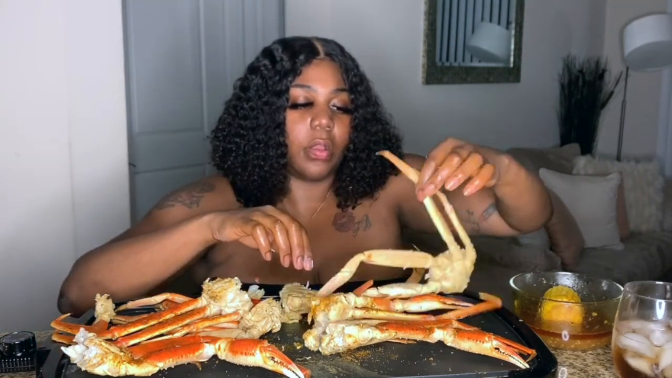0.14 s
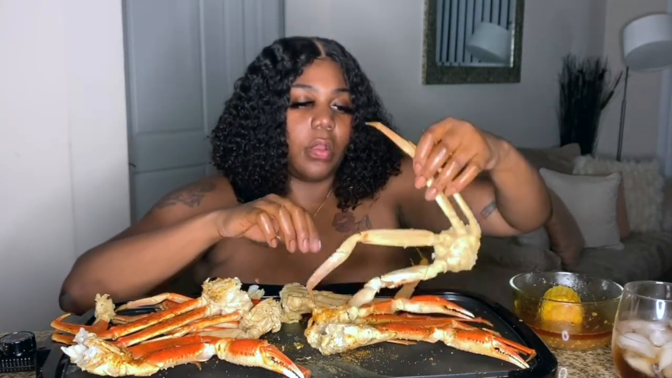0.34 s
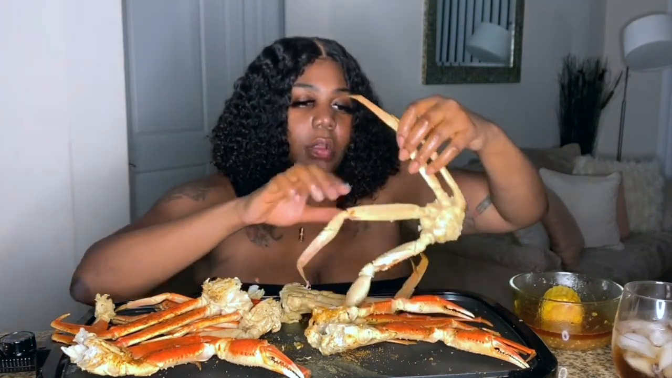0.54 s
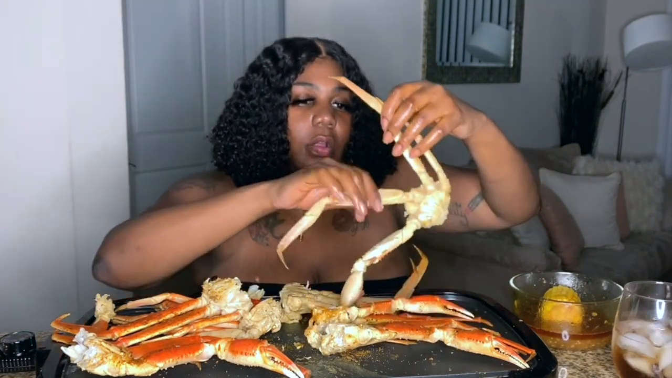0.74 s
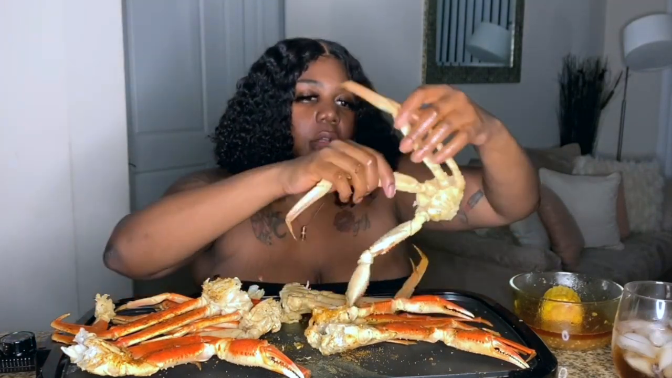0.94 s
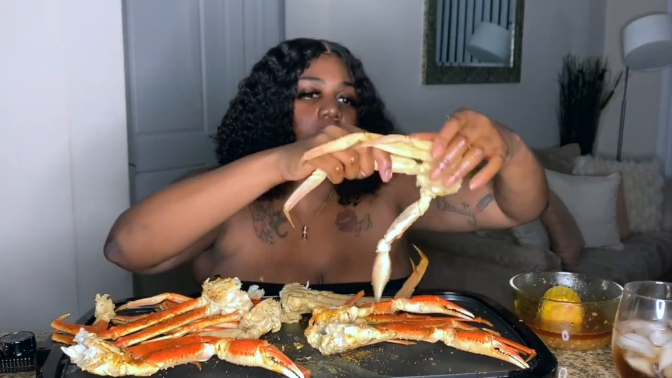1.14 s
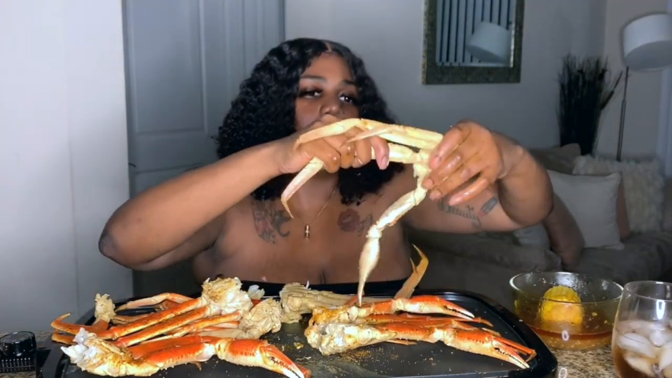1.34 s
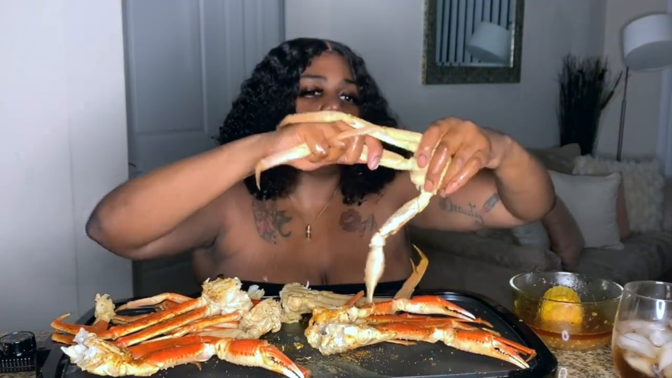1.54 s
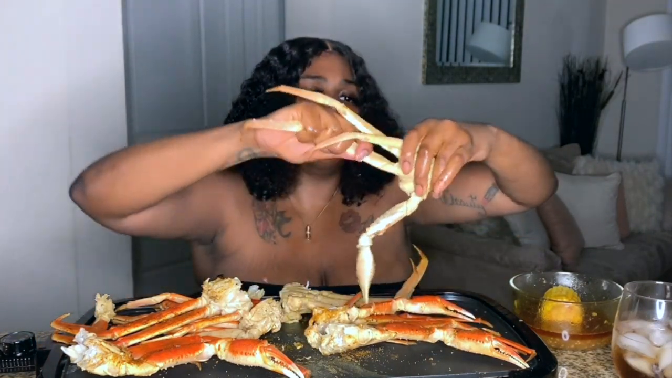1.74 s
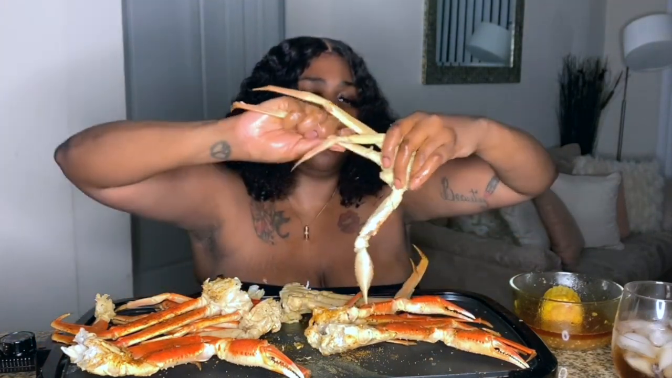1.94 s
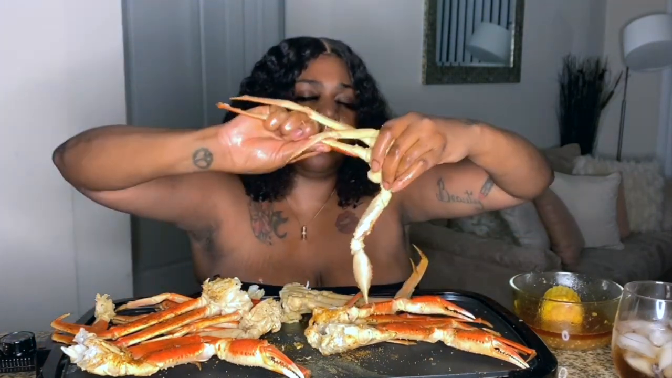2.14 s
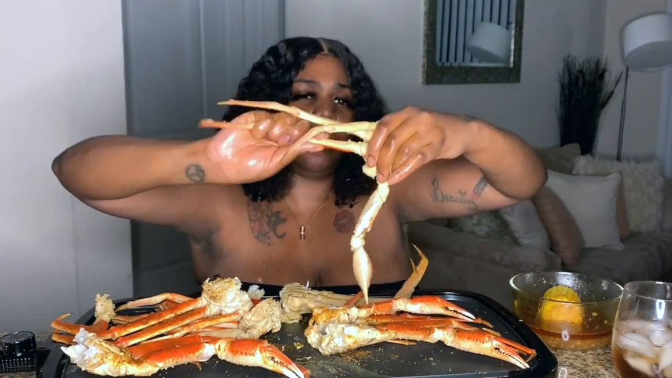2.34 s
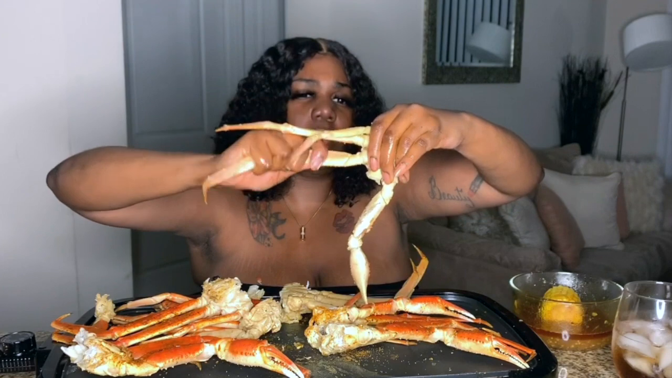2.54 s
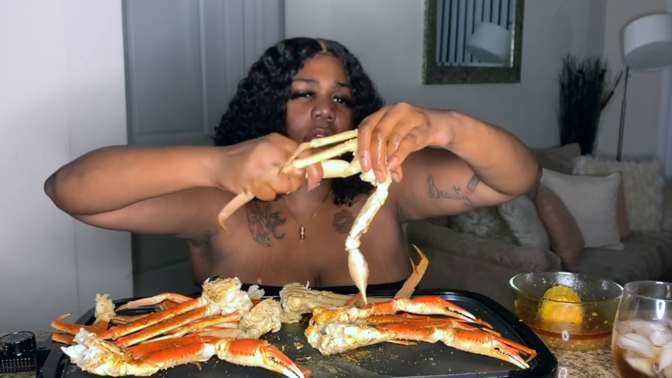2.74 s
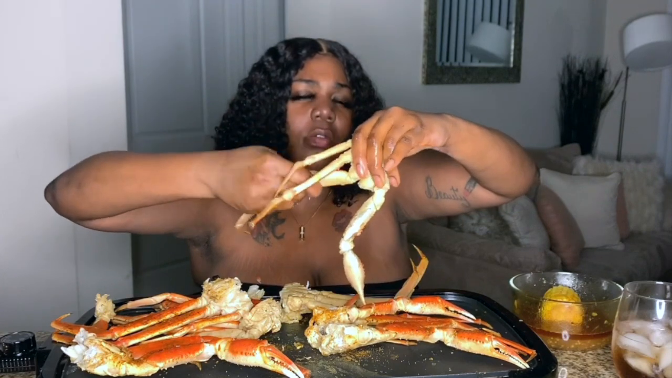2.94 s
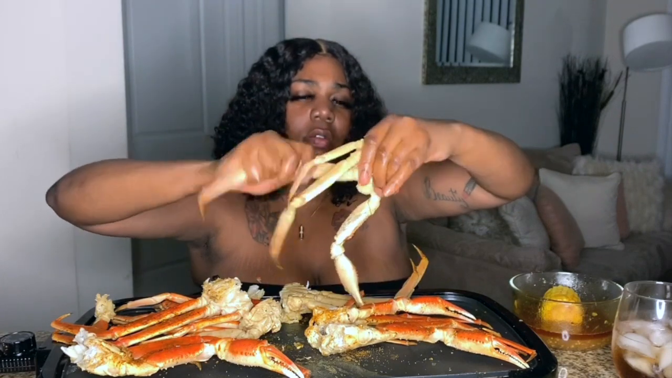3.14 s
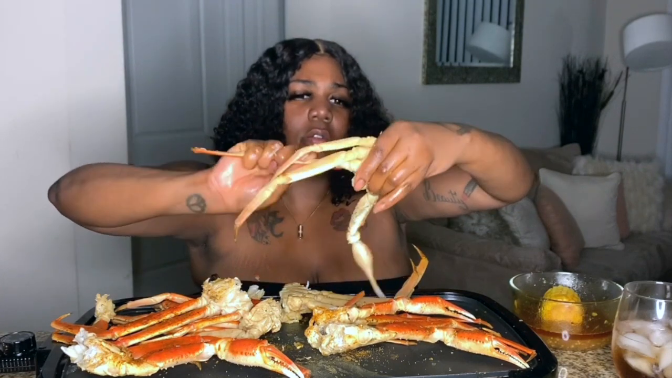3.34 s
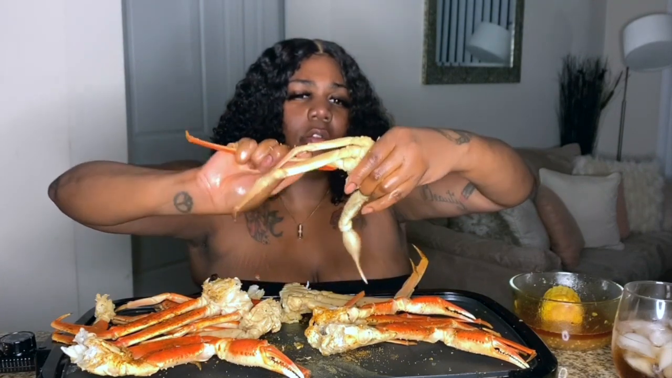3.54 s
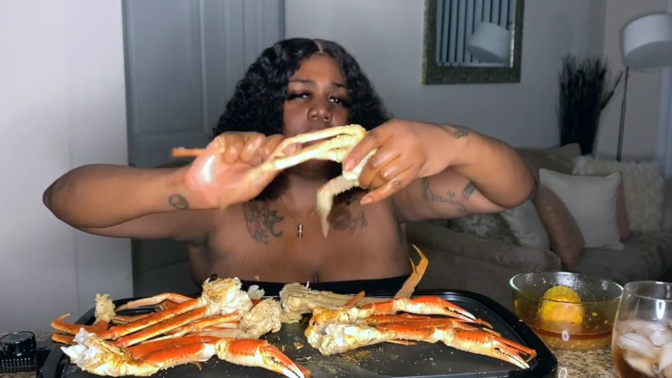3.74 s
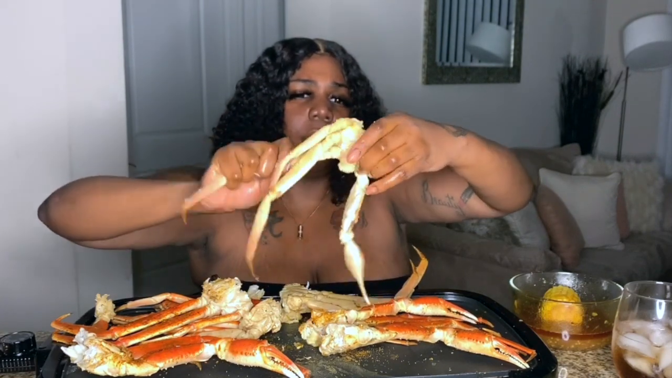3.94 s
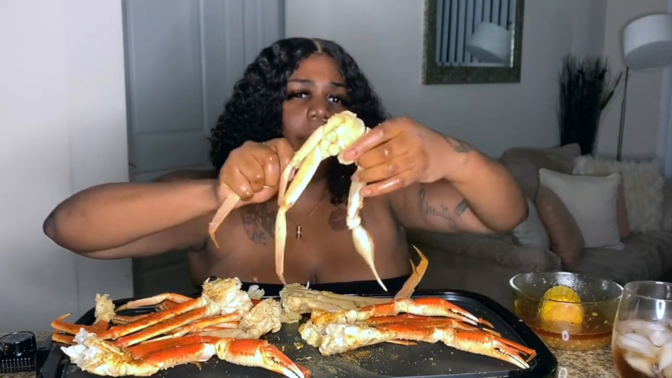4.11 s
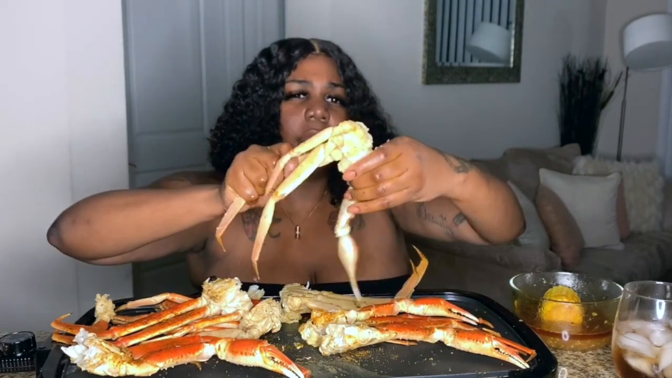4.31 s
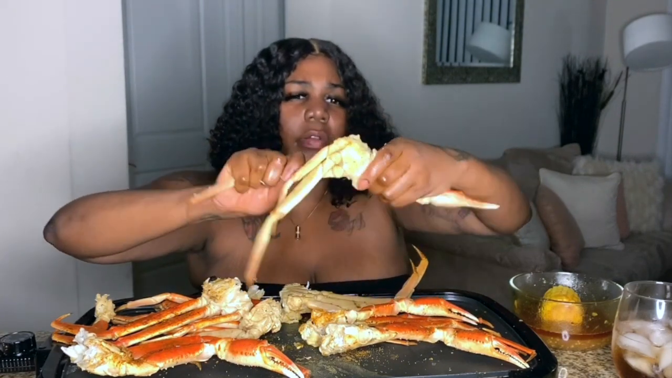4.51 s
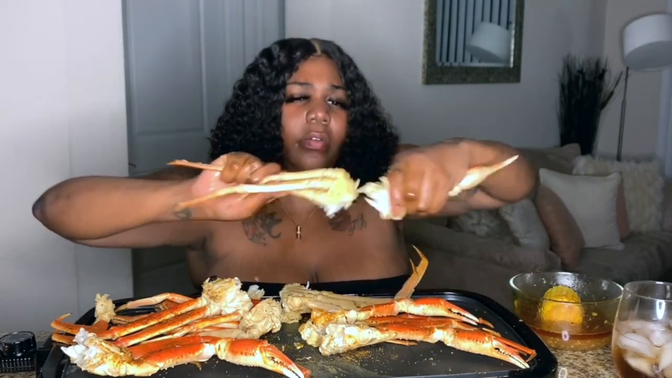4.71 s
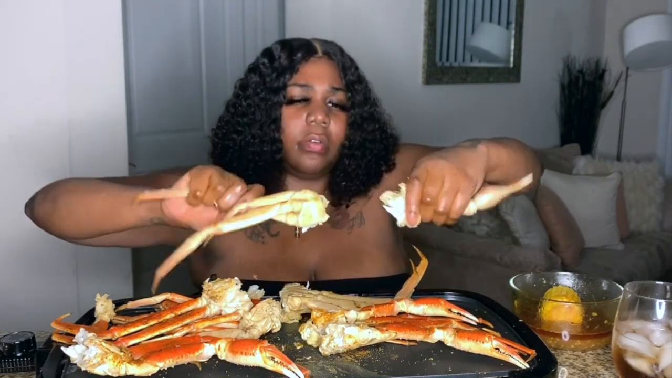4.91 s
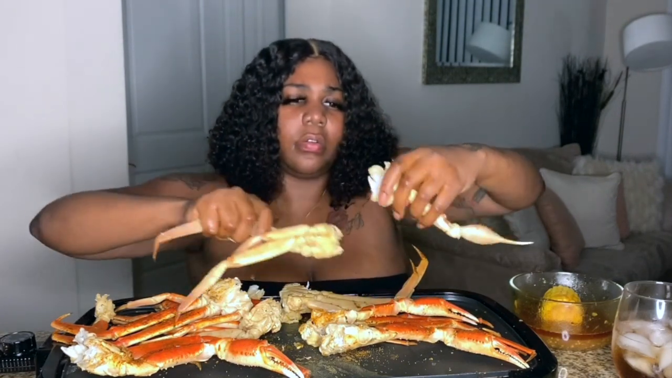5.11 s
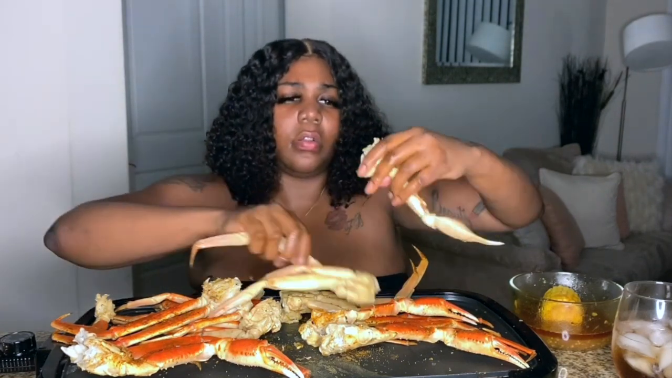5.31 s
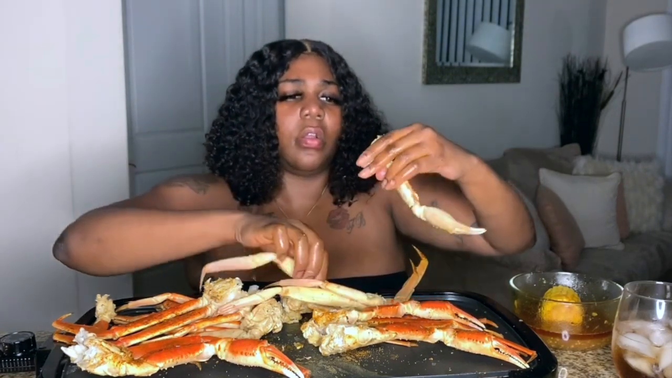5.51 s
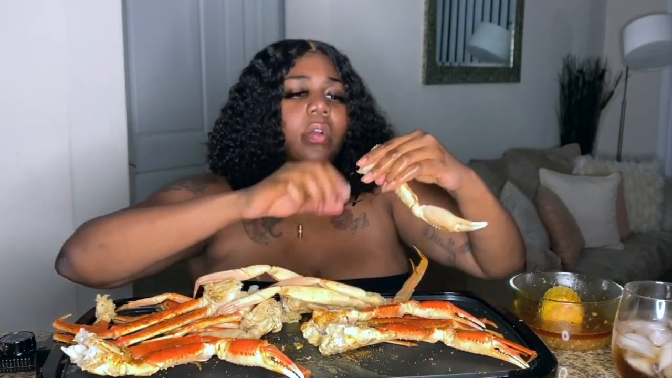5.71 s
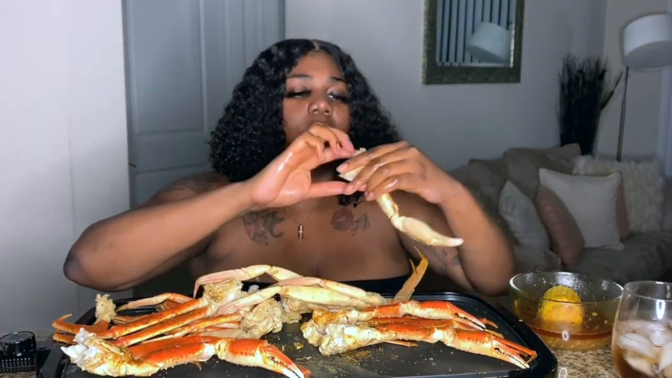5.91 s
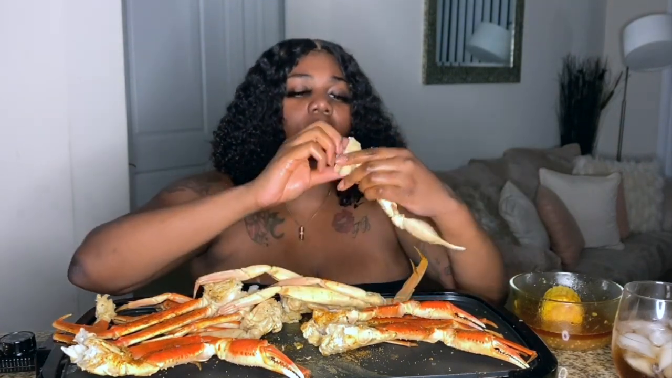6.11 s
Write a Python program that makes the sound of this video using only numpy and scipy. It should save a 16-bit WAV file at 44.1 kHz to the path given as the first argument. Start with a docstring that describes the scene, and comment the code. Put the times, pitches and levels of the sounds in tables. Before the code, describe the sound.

Crab legs scrape and tap each other as one is lifted off a tray. Hands bend it, and the shell crunches in several short bursts, each with a few sharp snaps, the biggest as a joint tears apart. A piece is then put down with a soft scrape. A close stereo microphone hears it in a small room with a faint, steady hum.

```python
"""Cracking crab legs

Cooked crab legs are lifted off a tray, bent until the shell crunches and snaps, torn apart and put down.
Each bend is a swarm of tiny breaks with a few sharp cracks in it; loose legs scrape and tap each other.
A close stereo microphone hears it all in a small room with a faint, steady hum."""
import sys
import numpy as np
from scipy import signal
from scipy.fft import rfft, irfft, next_fast_len
from scipy.io import wavfile
from scipy.ndimage import uniform_filter1d, map_coordinates

SR = 44100
rng = np.random.default_rng(int(sys.argv[2]) if len(sys.argv) > 2 else 0)


def wav_record(signal):
    """Record a signal, one row per channel, as 16-bit PCM in the file named by sys.argv[1]."""
    frames = np.transpose(np.atleast_2d(signal))
    bounded = np.clip(frames, -1, 1)
    # unit amplitude maps onto the largest positive 16-bit level
    quanta = np.round(bounded * 32767).astype(np.int16)
    wavfile.write(sys.argv[1], SR, quanta)


N = 271656


# sharp cracks: t/s, level/dB, shell pitch f/Hz, hollow knock level/dB, edge chatter level/dB
SHELL_CRACKS = [(0.2442, -44, 1740, -18, -25), (0.2935, -35.5, 5200, -7.5, 0),
                (0.3236, -37.5, 1910, -11, -3.5), (0.388, -43.5, 2600, 3, 3),
                (1.1133, -40.5, 6630, -31, -15.5), (1.2105, -51, 4800, -25, -16),
                (1.4924, -26.5, 6300, -18.5, -5), (1.5059, -35.5, 2170, -5, -13.5),
                (1.582, -34.5, 5200, -8.5, -7.5), (2.1888, -20.5, 8210, -29, -10),
                (2.198, -32, 4570, -25, -31.5), (2.2332, -19, 4160, -21.5, -9.5),
                (2.71, -37.5, 5280, -32, -12.5), (2.7328, -30, 7380, -26, -14),
                (2.7526, -29, 5930, -25, -26), (2.7835, -33, 8500, -18, -19.5),
                (2.9745, -45, 2160, -34, -3.5), (2.979, -39.5, 2570, -36.5, 3.5),
                (3.3055, -41.5, 3380, -7, -3.5), (3.334, -37, 5880, -3, -9),
                (3.374, -30.5, 7780, -27, -12.5), (3.3961, -36, 1836, -9, -21),
                (3.5445, -21, 6150, -27.5, -7.5), (3.5792, -33, 5080, -23, 3),
                (3.6021, -20, 8890, -38.5, -12.5), (3.606, -17, 8540, -38, -13),
                (3.6458, -22.5, 8650, -12.5, -3.5), (3.645, -26, 8640, -18.5, -2.5),
                (3.724, -37, 2030, -29, -21.5), (3.8943, -31.5, 6900, -12, 4),
                (3.9037, -19.5, 10300, -6.5, -24.5), (3.9422, -29.5, 2447, -29.5, -14),
                (3.9463, -22.5, 2413, -11, -5.5), (4.6745, -18.5, 5570, -29.5, -17.5),
                (4.7048, -23.5, 6460, -32, -10), (4.7143, -18.5, 5980, -30.5, -6.5),
                (5.1965, -72, 3890, -16.5, -11), (5.243, -43, 4070, -21.5, -8)]
def cracks():
    """The shell splits at each of its weak spots."""
    track = np.zeros((2, N))
    for s, db, hz, knock_db, chatter_db in SHELL_CRACKS:
        add(track, s, amp(db) * crack(hz, knock_db, chatter_db))
    return track


def crack(hz, knock_db, chatter_db, split_s=.0003, chatter_s=.0025):
    """One split and the chatter of its edges ring the shell and the hollow behind it."""
    t = np.arange(1536) / SR
    split, chatter = rng.standard_normal((2, 2, len(t)))
    split *= np.exp(-t / split_s)
    chatter *= (1 - np.exp(-t / .0023)) * np.exp(-t / chatter_s)
    ring_hz = hz * rng.uniform(.94, 1, 2)

    def shell(f):
        body = resonance(f, hz, .28 * hz)
        rings = amp(-4) * sum(resonance(f, r, 110) for r in ring_hz)
        edge = amp(-3) * resonance(f, 1.7 * hz, .91 * hz)
        # a small piece gives off no bass and nothing far above its pitch
        return (body + rings + edge) * resonance(f, .94 * hz, 1.5 * hz) ** 2

    unit_energy = lambda x: x / np.linalg.norm(x, axis=1, keepdims=True)
    snap = unit_energy(filtered(split, shell))
    rattle = amp(chatter_db + 5.5) * unit_energy(filtered(chatter, shell))
    knock = amp(knock_db) * unit_energy(filtered(split + .2 * chatter, hollow))
    return 6.3 * (snap + rattle + knock)


def crumbling(start_db=-19.5, fade_db_per_s=451):
    """Loudness over time of the broken edge crumbling after each crack."""
    gain, t = np.zeros(N), np.arange(SR // 5) / SR
    for s, db, *_ in SHELL_CRACKS:
        add(gain, s, amp(db + start_db - fade_db_per_s * t))
    return gain


# notes of the air inside a leg: f/Hz, width/Hz, level/dB
LEG_AIR = [(518.5, 23, -0.5), (608, 60, -5), (860, 180, -5.5), (1080, 110, -5.5), (1423, 120, -3)]
def hollow(f):
    """The air in a leg boosts a few low notes."""
    return sum((-1) ** k * amp(db) * resonance(f, hz, width) for k, (hz, width, db) in enumerate(LEG_AIR))


# bends: peak t/s, rise/s, hold/s, level/dB, splinters relative to that/dB, shell pitch f/Hz
SHELL_BENDS = [(1.466, .008, .008, -57, -10, 5710), (1.502, 0.026, .008, -44.5, -0.5, 6600),
               (1.535, .02, 0.027, -51, -23, 5320), (2.047, 0.024, .006, -56, -2.5, 4900),
               (2.136, 0.022, .03, -42.5, 0, 2400), (2.2, 0.027, 0.064, -45, -6.5, 4524),
               (2.712, .018, 0.078, -43.5, -1.5, 6400), (2.845, 0.032, 0.0033, -60, 5, 3800),
               (2.902, .008, 0.0023, -60.5, -6, 5570), (2.975, .012, 0.0072, -46, -11, 2464),
               (3.035, 0.014, 0.0081, -53, -3.5, 4594), (3.255, .02, .005, -74.5, -8.5, 3470),
               (3.336, .04, 0.0088, -49.5, -19, 5504), (3.375, .02, 0.0095, -47, -1.5, 2290),
               (3.503, .04, 0.049, -39.5, -2.5, 2600), (3.602, .05, 0.086, -41.5, 0.5, 4900),
               (3.72, .06, 0.0053, -46, -3, 4390), (3.904, .032, 0.0033, -38.5, 3, 6780),
               (3.945, .03, 0.033, -44, -0.5, 1900), (4.56, .02, 0.013, -67, -22, 3900),
               (4.598, .025, .012, -60.5, 2.5, 3813), (4.662, .045, 0.076, -42.5, 3.5, 5600),
               (4.785, .05, 0.012, -52, 4.5, 5550)]
# tone of the crunch: f/Hz, level/dB
CRUNCH_TONE = [(710, -51), (1200, -23), (1450, -20.5), (1800, 3.5), (2060, 0), (2230, 1.5), (2450, -5.5),
               (2740, -3), (3730, 1.5), (6880, -7), (8000, -20), (10400, -35), (17600, -120)]
def crunch():
    """Bent shell gives way in a swarm of tiny breaks."""
    grains = fractures(per_second=7000, spread_db=2.5)
    return shell_noise(SHELL_BENDS, CRUNCH_TONE, grains, fade_db_per_s=191, ring_db=9.5, octaves=.14,
                       patchy_db=4, bright_hz=17000, crumbs=crumbling())


# slides: peak t/s, rise/s, hold/s, level/dB, splinters relative to that/dB, shell pitch f/Hz
LEG_SLIDES = [(0.004, 0.015, 0.0015, -60, -32, 3500), (0.252, 0.022, 0.029, -49.5, -8, 3100),
              (0.294, 0.031, 0.0034, -44, -0.5, 3120), (0.326, 0.028, .004, -44.5, -18, 1940),
              (0.392, .008, 0.0036, -47.5, -32, 3000), (0.475, .05, 0.012, -64.5, -22, 3400),
              (0.898, .03, 0.004, -56.5, -17.5, 3220), (1.095, 0.023, 0.024, -60, -14, 2750),
              (1.145, 0.031, .01, -41.5, -16, 3000), (1.19, 0.018, .012, -49.5, -28, 2893),
              (5.092, 0.022, 0.006, -55, 1, 5600), (5.201, .01, .005, -51.5, -37, 4500),
              (5.245, 0.019, 0.018, -48.5, -34, 4510), (5.293, 0.034, 0.004, -52, -5.5, 5400),
              (5.43, .03, .015, -57.5, -15.5, 1750), (5.645, 0.062, 0.0027, -69.5, -8, 2000),
              (6.075, 0.0093, 0.0029, -81.5, -12, 5000)]
# tone of the scrape: f/Hz, level/dB
SCRAPE_TONE = [(590, -36), (1000, -5.5), (1870, 0), (2270, 1.5), (2580, -7), (2870, -7.5), (3130, -5),
               (3990, -1), (4350, -5), (5900, -14), (8000, -26.5), (10400, -80), (17600, -120)]
def scrape():
    """Legs slide over the pile, shell rubbing on shell."""
    grains = fractures(per_second=3900, spread_db=3)
    return shell_noise(LEG_SLIDES, SCRAPE_TONE, grains, fade_db_per_s=239, ring_db=9, octaves=.32,
                       patchy_db=7, bright_hz=11500)


# tone of the finest splinters: f/Hz, level/dB
SPLINTER_TONE = [(4500, -33), (6800, -4.5), (8200, -8.5), (9500, -2), (11500, -3.5), (13500, -6.5),
                 (15500, -6), (17000, -24.5)]
def shell_noise(strokes, tone, grains, fade_db_per_s, ring_db, octaves, patchy_db, bright_hz, crumbs=0):
    """Tiny clicks ring the most strained piece of shell; splinters add treble and stop first."""
    s, rise_s, hold_s, db, splinter_db, shell_hz = np.transpose(strokes)
    strain = swell(s, rise_s, hold_s, db, fade_db_per_s)
    splintering = swell(s, rise_s, hold_s, db + splinter_db, fade_db_per_s=302.5)
    hz, t, spectra = signal.stft(grains, SR, nperseg=256)
    # each spot of the shell favours its own pitches
    patches = uniform_filter1d(rng.standard_normal(spectra.shape[1:]), size=3, axis=0)
    spectra *= amp(patchy_db * unit(uniform_filter1d(patches, size=14, axis=1)))
    pitch_hz = np.interp(t, np.arange(N) / SR, shell_hz[strain.argmax(axis=0)])
    octaves_away = np.log2((hz[:, None] + 1) / pitch_hz)
    colour = amp(along(tone, hz)[:, None] + ring_db * np.exp(-(octaves_away / octaves) ** 2))
    colour /= np.linalg.norm(colour, axis=0)
    body = unit(signal.istft(spectra * colour, nperseg=256)[1][:, :N])
    splinters = coloured(signal.istft(spectra, nperseg=256)[1][:, :N], SPLINTER_TONE)
    body_gain = np.hypot(strain.max(axis=0), crumbs)
    splinter_gain = np.hypot(splintering.max(axis=0), amp(-11) * crumbs)
    return body_gain * body + splinter_gain * lowpass(splinters, bright_hz)


def fractures(per_second, spread_db):
    """Two streams of tiny breaks at random times, a few much larger than the rest."""
    sizes = amp(spread_db * np.clip(rng.standard_normal(N), -2, 2))
    return (rng.random(N) < per_second / SR) * sizes * rng.standard_normal((2, N))


def swell(s, rise_s, hold_s, db, fade_db_per_s, rise_db=16):
    """Loudness of each hand movement, one per row: it rises, holds and fades."""
    t = np.arange(N) / SR - s[:, None]
    before_db = rise_db * np.minimum(t / rise_s[:, None], 0) ** 2
    after_db = fade_db_per_s * np.maximum(t - hold_s[:, None], 0)
    return amp(np.maximum(db[:, None] - before_db - after_db, -150))


# meat and membrane giving way: peak t/s, rise/s, hold/s, level/dB
JOINT_PULLS = [(0.33, .06, .065, -60), (1.085, .02, .075, -53.5), (3.385, .17, .025, -56),
               (3.906, 0.025, .003, -31)]
def joints():
    """Tearing membrane drums on the hollow leg."""
    pull = swell(*np.transpose(JOINT_PULLS), fade_db_per_s=316.5).max(axis=0)
    return pull * unit(filtered(fractures(per_second=1500, spread_db=8), hollow))


# taps: t/s, level/dB
CLAW_TAPS = [(1.074, -40), (1.090, -35), (1.140, -24.5), (1.158, -35.5), (1.186, -34.5)]
# notes of the claw: f/Hz, level/dB, time to fade 60 dB/s
CLAW_NOTES = [(1490, -9, 0.065), (2180, -16, 0.11), (2590, -10, .1), (2826, 3.5, 0.023),
              (3350, -11.5, 0.046), (3820, -12, 0.033), (4100, -18, 0.089), (5000, -14, 0.06),
              (6940, -15, 0.06)]
def taps():
    """A claw tip taps the pile with a bright click."""
    return struck(CLAW_TAPS, CLAW_NOTES)


# bumps: t/s, level/dB
TRAY_BUMPS = [(0.332, -45.5), (0.392, -53), (5.452, -52.5)]
# notes of the tray: f/Hz, level/dB, time to fade 60 dB/s
TRAY_NOTES = [(370, -12, 0.095), (486, -3, 0.16), (524, 7, 0.11), (640, -3, .1), (800, -9, 0.27)]
def thumps():
    """The legs bump the tray, which gives a low ring."""
    return struck(TRAY_BUMPS, TRAY_NOTES)


def struck(blows, notes, attack_s=.002):
    """A hard thing rings briefly, with a new mix of its notes at every touch."""
    track, t = np.zeros((2, N)), np.arange(SR // 3) / SR
    for s, db in blows:
        ring = 0
        for hz, level, fade_s in notes:
            fade = amp(level + rng.normal(0, 4.7) - 60 * t / fade_s)
            ring += fade * np.sin(2 * np.pi * (hz * t + rng.random((2, 1))))
        add(track, s, amp(db) * ring * (1 - np.exp(-t / attack_s)))
    return track


# echo of the walls: f/Hz, time to fade 60 dB/s
WALL_ECHO = [(300, 0.56), (1000, 0.23), (2500, 0.3), (4800, 0.37), (7500, 0.14), (15000, .18)]
def room(x, gap_s=.004):
    """The walls answer after a short gap; the treble dies first."""
    hz, t, spectra = signal.stft(rng.standard_normal((2, SR * 3 // 4)), SR, nperseg=256)
    fade = amp(-60 * t / along(WALL_ECHO, hz)[:, None])
    tail = signal.istft(spectra * fade, SR, nperseg=256)[1]
    tail *= 1 - np.exp(-(np.arange(tail.shape[1]) / SR / gap_s) ** 2)
    return signal.fftconvolve(x[:1], tail / np.linalg.norm(tail[0]), axes=1)[:, :N]


# loudness of the low background: t/s, level/dB
RUMBLE_LEVEL = [(0.0, -59.5), (0.1, -63.5), (0.51, -56), (0.79, -65), (1.2, -59), (1.51, -59),
                (1.68, -57.5), (2.01, -63.5), (2.38, -58), (2.66, -61), (2.91, -57.5), (3.91, -57.5),
                (4.68, -64.5), (5.44, -57), (5.68, -63.5), (6.16, -65)]
# tone of the air and of the hiss: f/Hz, level/dB
AIR_TONE = [(18, -63), (30, -33), (114, -18.5), (140, -12), (215, -10.5), (278, 2), (325, -10), (360, -3),
            (442, -14.5), (481, -14.5), (819, -20), (939, -20.5), (1020, -24.5), (1280, -20.5), (1800, -38),
            (2340, -71), (3960, -120)]
HISS_TONE = [(1200, -30), (1800, -7.5), (2400, -8), (4500, -16.5), (6500, -17.5), (11000, -19.5),
             (13500, -34.5), (16000, -44)]
# notes of the hum: f/Hz, level/dB
HUM_NOTES = [(59, -84), (97, -79), (243, -71), (269.5, -69), (295, -63), (361, -79), (490, -69.5)]
def room_tone():
    """A wavering hum over a soft rush of air and a trace of hiss."""
    t = np.arange(N) / SR
    level_db = np.interp(t, *np.transpose(RUMBLE_LEVEL))
    air = coloured(rng.standard_normal((2, N)), AIR_TONE)
    rumble = lowpass(air, 480)
    rush = amp(level_db) * (unit(rumble) + amp(-5.5) * unit(air - rumble))
    hum = np.zeros((2, N))
    for hz, db in HUM_NOTES:
        for channel in hum:
            channel += amp(db) * np.sin(2 * np.pi * hz * t + 1.1 * wobble(7))
    hum *= amp(.3 * (level_db - level_db.mean()))  # gently follows the rumble
    hiss = amp(-88.5) * coloured(rng.standard_normal((2, N)), HISS_TONE)
    return rush + hum + hiss


# how alike left and right are: f/Hz, likeness (1 = the same)
LIKENESS = [(60, .9), (300, .7), (1000, .55), (4000, .5), (6500, .65), (8500, .88), (15000, .85)]
# how far left runs ahead of right: f/Hz, phase/rad
LEFT_LEAD = [(100, 0), (1000, .1), (2800, 1.1), (5300, 1.8), (6000, .2), (7200, -1), (8550, -3.1),
             (10400, -6), (11600, -6.6), (13600, -9.4), (15000, -12.2), (16000, -12.7)]
# how much louder left is than right: f/Hz, level/dB
LEFT_LEVEL = [(100, -1.5), (300, -3), (1000, -0.5), (2500, 1.5), (5500, -4.5), (8000, -0.5), (14000, 0.5)]
def microphone(pair):
    """Both sides share the first signal; left adds the second and right subtracts it."""
    angle = lambda f: np.arccos(np.clip(along(LIKENESS, f), -1, 1)) / 2
    shared, apart = filtered(pair, lambda f: np.array([np.cos(angle(f)), np.sin(angle(f))]))
    left = lambda f: amp(along(LEFT_LEVEL, f) / 2) * np.exp(.5j * along(LEFT_LEAD, f))
    sides = np.array([shared + apart, shared - apart])
    return filtered(sides, lambda f: np.array([left(f), 1 / left(f)]))


def amp(db):
    """Turn decibels into a gain."""
    return 10 ** (np.asarray(db) / 20)


def unit(x):
    """Scale to an average strength (rms) of 1."""
    return x / np.sqrt(np.mean(x ** 2) + 1e-20)


def along(points, hz):
    """Read between the rows of a frequency table, on a log scale."""
    f, values = np.transpose(points)
    return np.interp(np.log(hz + 1), np.log(f + 1), values)


def wobble(rate):
    """A smooth random curve through rate points a second."""
    span = N * rate / SR
    coarse = map_coordinates(rng.standard_normal(int(span) + 4), [np.linspace(0, span, 2000)])
    return np.interp(np.arange(N), np.linspace(0, N, len(coarse)), coarse)


def filtered(x, response):
    """Scale and delay each frequency f of x by response(f)."""
    n = x.shape[-1]
    padded = next_fast_len(n + min(n, 8192))
    return irfft(rfft(x, padded) * response(np.fft.rfftfreq(padded, 1 / SR)), padded)[..., :n]


def lowpass(x, hz, steepness=6):
    """Turn down everything above hz."""
    return filtered(x, lambda f: 1 / (1 + (f / hz) ** steepness))


def coloured(x, tone):
    """Shape x with a tone table, at strength 1."""
    return unit(filtered(x, lambda f: amp(along(tone, f))))


def resonance(f, hz, width):
    """Response of something that rings at one pitch."""
    return 1j * f * width / (hz * hz - f * f + 1j * f * width)


def add(track, s, sound):
    """Mix a sound into a track at s seconds."""
    part = track[..., max(round(s * SR), 0):][..., :sound.shape[-1]]
    part += sound[..., :part.shape[-1]]


def scene():
    """Shell sounds close to the microphone, the room around them."""
    handling = crunch() + scrape() + amp(-6) * taps() + amp(-4.5) * thumps() + amp(-4.5) * joints()
    snaps = amp(-.5) * cracks()
    echo = room(amp(-12) * handling + amp(-8) * snaps)
    return microphone(handling + snaps + echo + room_tone())


def record(dry):
    """The very highest treble is cut off sharply."""
    return lowpass(dry, hz=16000, steepness=120)


dry = scene()
out = record(dry)
wav_record(out)
```